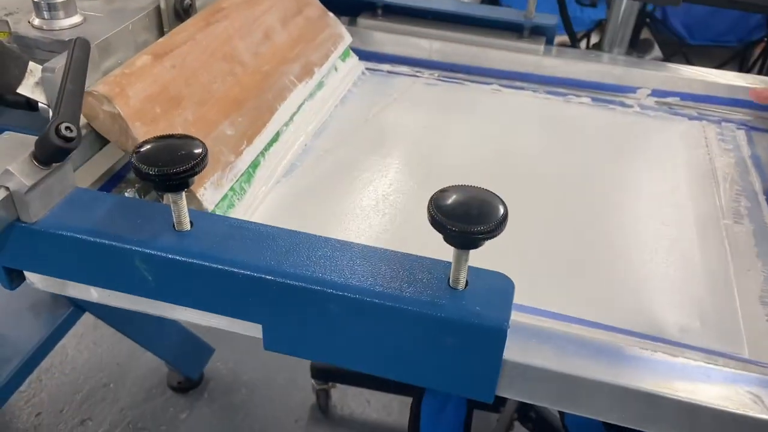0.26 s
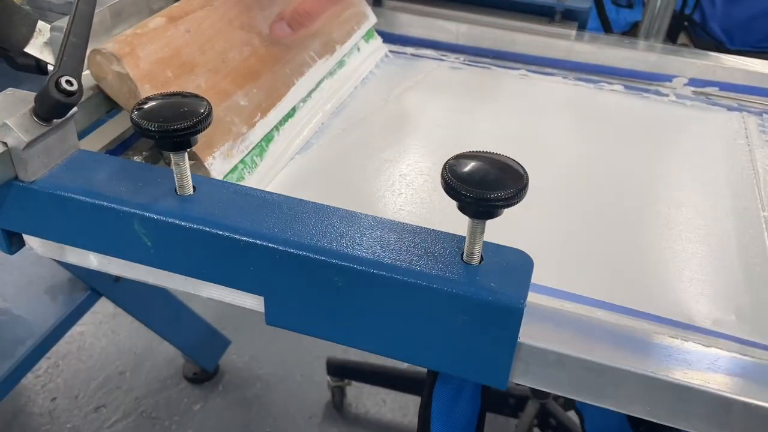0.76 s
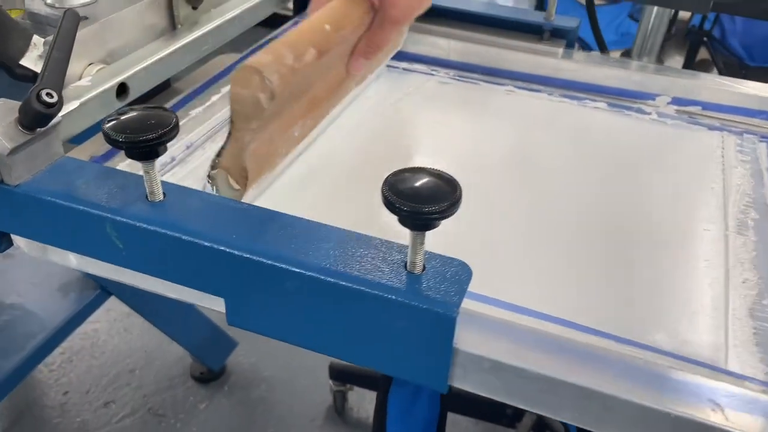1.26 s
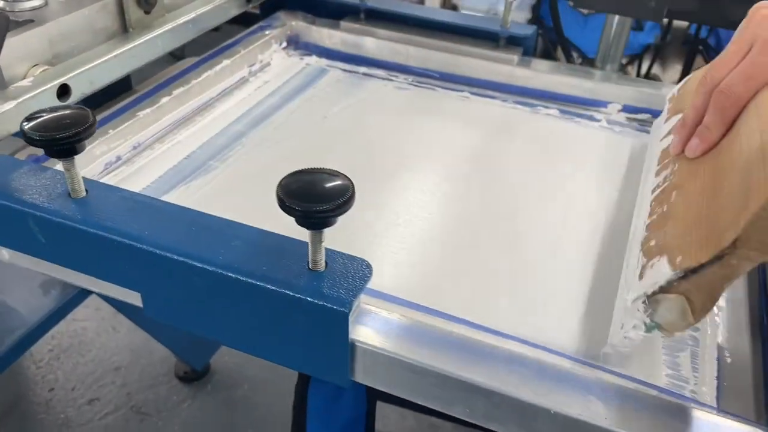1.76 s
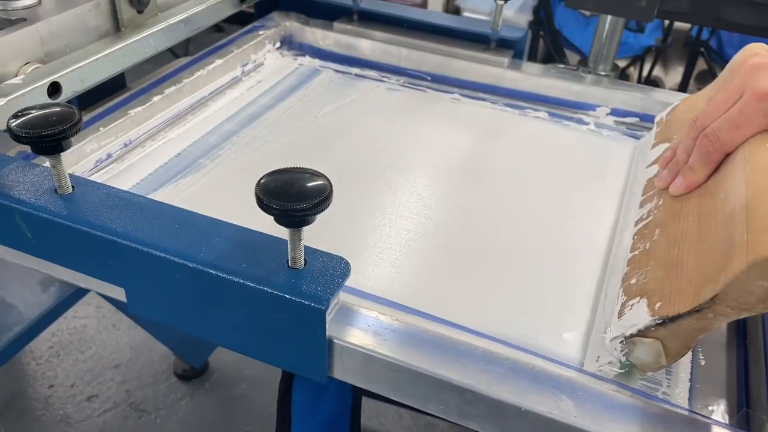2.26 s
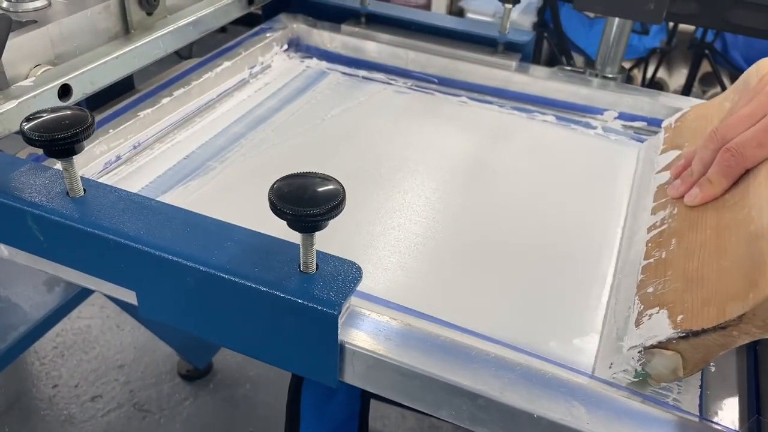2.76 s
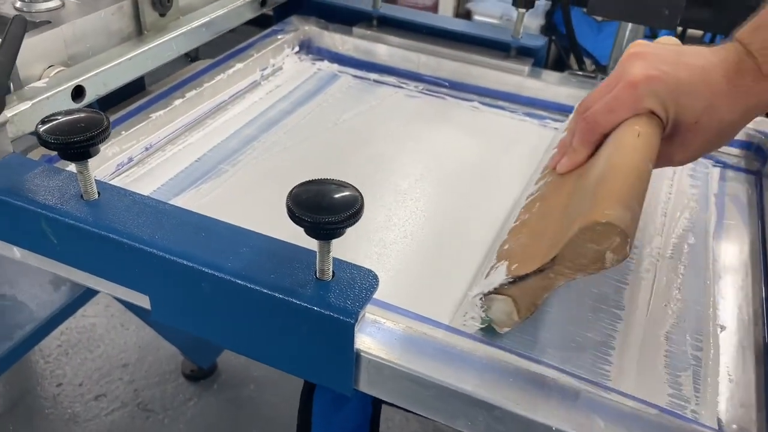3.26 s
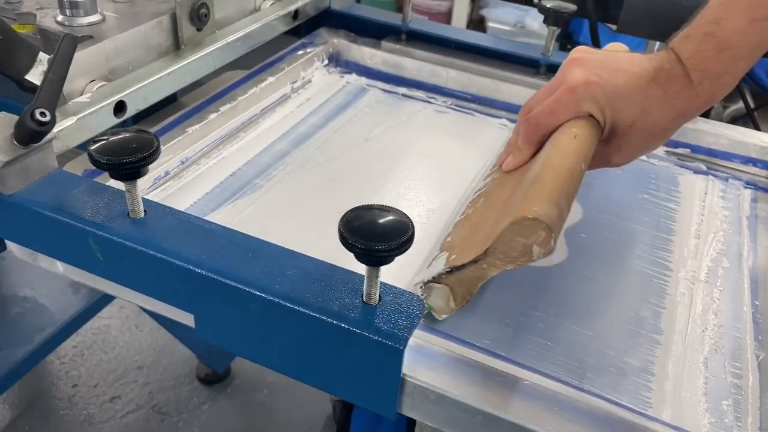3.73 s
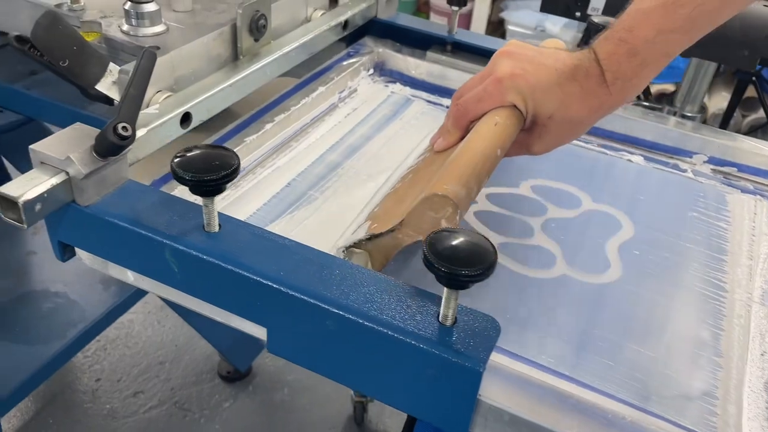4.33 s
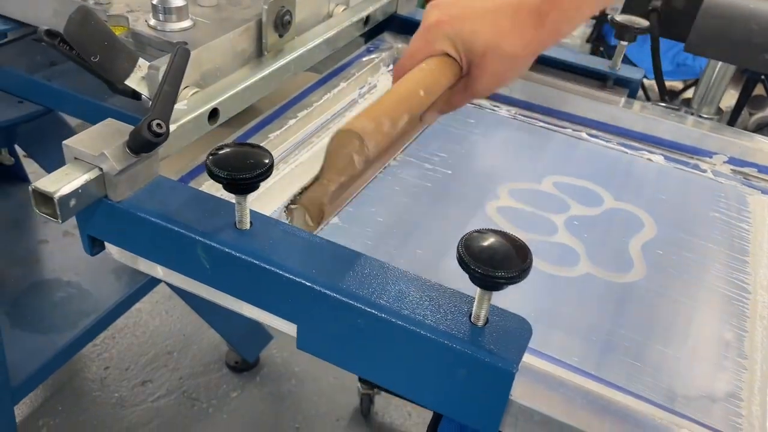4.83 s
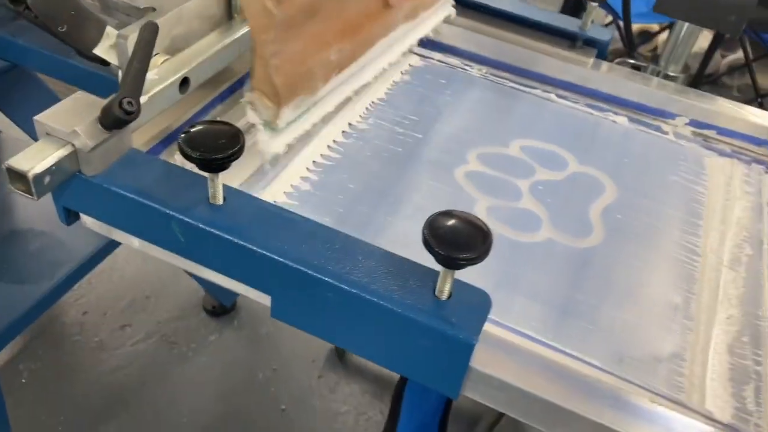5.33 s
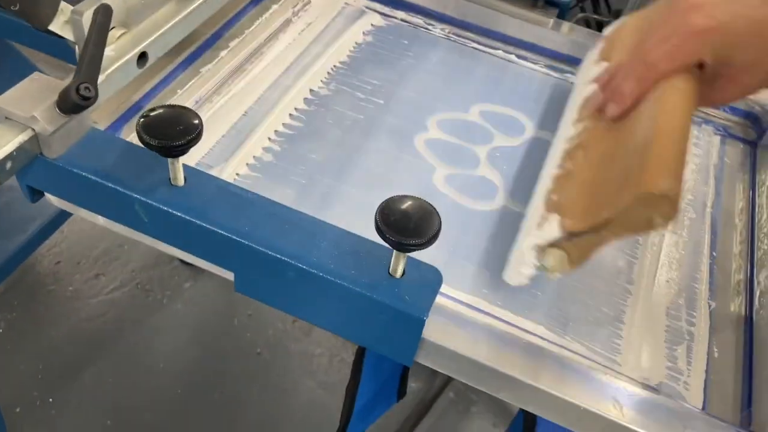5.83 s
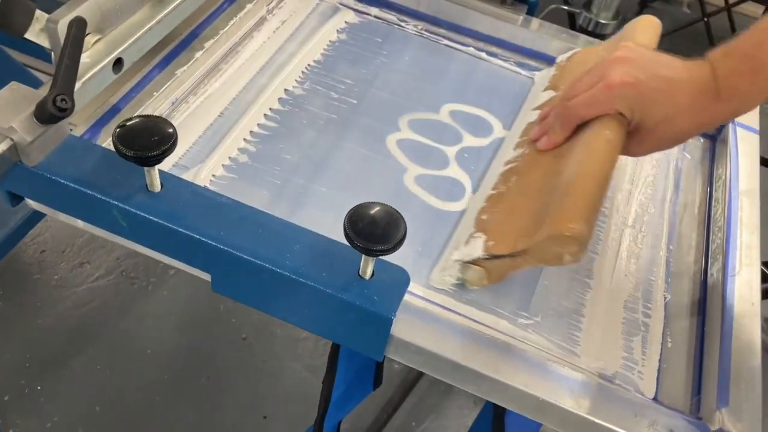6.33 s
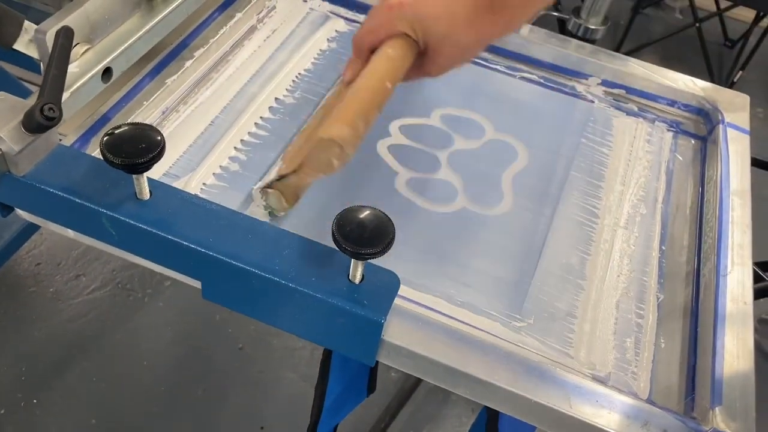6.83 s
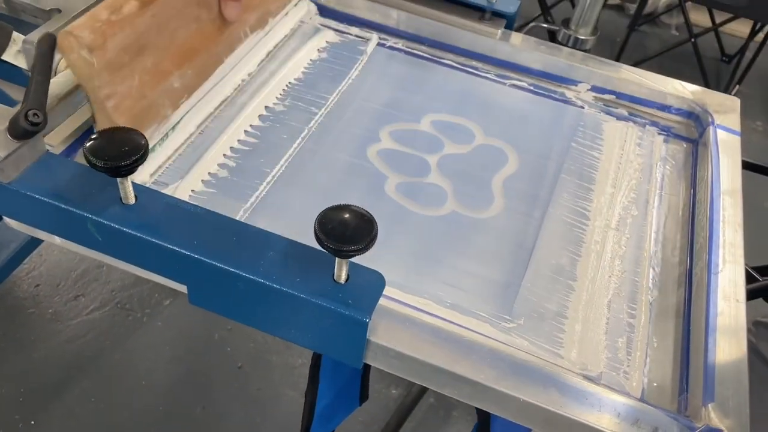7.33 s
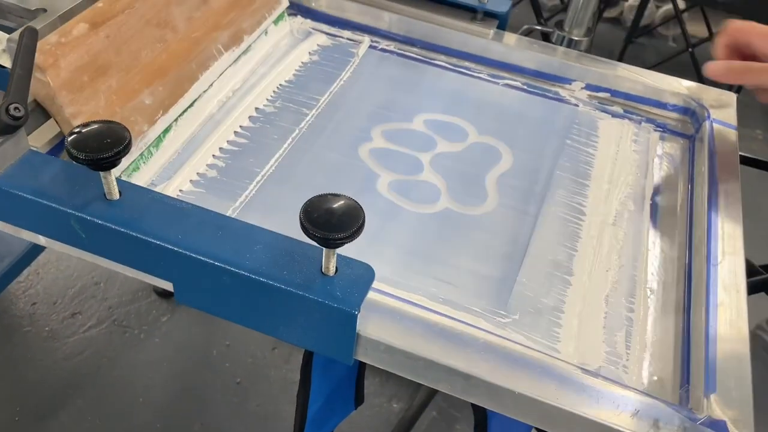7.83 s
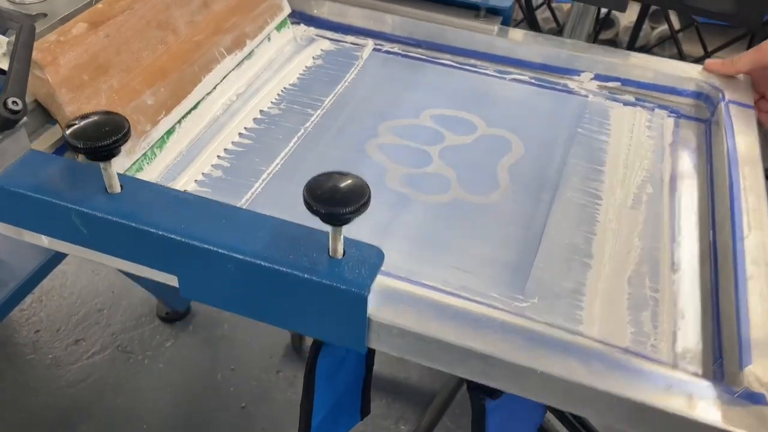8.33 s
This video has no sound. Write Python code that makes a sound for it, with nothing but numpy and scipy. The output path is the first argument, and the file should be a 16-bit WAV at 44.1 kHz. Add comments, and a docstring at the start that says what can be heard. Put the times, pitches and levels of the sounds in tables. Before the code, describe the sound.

Close hand-held stereo in a small, dull-sounding workshop with steady low fan hum. Light knocks and a sticky crack, a soft drum-like thump on a taut screen, then a long wavering, singing scrape of a squeegee over mesh. A crack and thump precede a faster, higher pull. Crunchy rubs follow, then a hard knock on the frame, and finally springs squeak.

```python
"""A humming workshop: a squeegee is pulled twice along a mesh screen, near a hand-held stereo microphone.
The blade crossing the threads sings at speed times thread count, over a hiss of ink and mesh.
It thumps the taut screen and knocks the platen and the frame (ringing modes), with cracks, scuffs, ticks,
rubs and peeling ink (noise bursts). The hinge springs squeal as the screen is lifted: thin lines with
overtones. A short dull room tail follows."""
import sys
import numpy as np
from scipy import signal
from scipy.fft import rfft, irfft
from scipy.io import wavfile
from scipy.ndimage import uniform_filter1d

SR = 44100
rng = np.random.default_rng(int(sys.argv[2]) if len(sys.argv) > 2 else 0)


def file_out(sig):
    """Save sig as 16-bit WAV at sys.argv[1]."""
    # one column per channel
    cols = np.atleast_2d(sig).T
    # limit, then scale
    lim = np.clip(cols, -1, 1)
    pcm = np.round(lim * 32767).astype(np.int16)
    wavfile.write(sys.argv[1], SR, pcm)


def to_linear_factor(level_db):
    """Convert decibel levels (scalar or array-like) to linear amplitude factors."""
    exponent = np.asarray(level_db, float) / 20
    return 10 ** exponent


N = 378364
T = np.arange(N) / SR
HZ = np.fft.rfftfreq(N, 1 / SR)


def unit(x):
    """Scale to rms 1."""
    return x / np.sqrt(np.mean(np.abs(x) ** 2))


def across(table, column=1):
    """Column of an (f/Hz, ..) table at every frequency bin, interpolated on log frequency."""
    table = np.transpose(table)
    return np.interp(np.log(HZ + 1), np.log(table[0]), table[column])


def walk(cutoff_hz):
    """Smooth chance below cutoff_hz, rms 1."""
    lowpass = signal.butter(2, cutoff_hz, fs=SR, output="sos")
    return unit(signal.sosfilt(lowpass, rng.standard_normal(N)))


def bandpass(x, low_hz, high_hz):
    """Second-order Butterworth band."""
    return signal.sosfilt(signal.butter(2, [low_hz, high_hz], "band", fs=SR, output="sos"), x)


def add(out, start_s, x):
    """Mix x into out from start_s."""
    i = int(start_s * SR)
    out[i:i + len(x)] += x[:N - i]


# workshop hum spectrum: (f/Hz, density/dB per Hz, left-right likeness/0-1)
HUM = [(22, -76, 0.94), (41.3, -66, 1), (62.6, -62, 0.98), (149, -65.5, 0.95), (250.3, -70, 0.79),
       (314, -77, 0.5), (554, -82, 0.17), (735, -80.5, 0), (1300, -85, 0), (1940, -88, 0),
       (2080, -88.5, 0.4), (2270, -86, 0.6), (2460, -89.5, 0.44), (2800, -90, 0.54), (4000, -93.5, 0.17),
       (5650, -101.5, 0.37), (5970, -104, 0.83), (10400, -110, 0.95), (13300, -114, 0.8),
       (15900, -130, 0.9)]


def hum():
    """Fans and distant machines: shaped noise, left-right likeness set by frequency."""
    like = np.clip(across(HUM, column=2), 0, 1)
    a, b = rfft(rng.standard_normal((2, N))) * to_linear_factor(across(HUM)) * np.sqrt(SR / 2)
    mid = a * np.sqrt((1 + like) / 2)
    side = b * np.sqrt((1 - like) / 2)
    level_drift = to_linear_factor(.6 * walk(2.5))
    return irfft(np.array([mid + side, mid - side]), N) * level_drift


# decay time and level of the room tail
ROOM_T60_S, ROOM_DB = .2, -11


def room(x):
    """Diffuse dull tail: decaying noise, different on each side."""
    t = T[:SR // 2]
    tail = rng.standard_normal((2, len(t))) * to_linear_factor(-60 * t / ROOM_T60_S) * (t > .004)
    tail = bandpass(tail, 250, 3500)
    tail = tail / np.sqrt(np.sum(tail ** 2) / 2)
    return to_linear_factor(ROOM_DB) * signal.fftconvolve(x[None], tail, axes=1)[:, :N]


# hinge springs slipping: (start/s, end/s, slip rate/Hz, mid-slip level before flutter/dB, loss per overtone/dB)
SQUEALS = [(.68, .735, 13500, -68, 30), (8.41, 8.525, 3413, -51, 30), (8.44, 8.52, 2977, -47, 9),
           (8.47, 8.65, 2519, -50, 14), (8.495, 8.6, 2040, -48, 9), (8.53, 8.62, 2336, -39.5, 30),
           (8.50, 8.6, 3165, -55, 20), (8.51, 8.6, 3321, -58, 20), (8.51, 8.61, 5437, -59, 9),
           (8.41, 8.455, 3750, -59, 20)]


def springs():
    """Stick-slip of steel coils: thin lines with overtones, a little unsteady, strongest envelope half way."""
    out = np.zeros(N)
    for start_s, end_s, hz, db, loss_db in SQUEALS:
        swell = np.interp(T, [start_s, (start_s + end_s) / 2, end_s], [0, 1, 0])
        swell = swell * to_linear_factor(4.4 * walk(51.0))
        phase = 2 * np.pi * np.cumsum(hz * (1 + 0.00148 * walk(25.))) / SR
        for k in range(1, int(15500 // hz) + 1):
            out += swell * to_linear_factor(db - loss_db * (k - 1)) * np.sqrt(2) * np.sin(k * phase)
    return out


CREST_S = .0053  # all modes of a blow crest together here


def blows(events, modes, lag_ms, ring_db):
    """Each blow: first wave of a few cycles plus a ring; bending waves bring the lows later."""
    out, t = np.zeros(N), T[:SR // 2]
    for start_s, db, contact_ms in events:
        for hz, mode_db, t60_s in modes:
            soft = 1 / (1 + (hz * contact_ms / 1000) ** 2)  # long contact dulls
            late_s = np.maximum(t - lag_ms / 1000 * np.sqrt(100 / hz), 0)
            swell = 1 - np.exp(-late_s * hz * 2)
            first_wave = np.exp(-late_s * hz / 1.2)
            ring = to_linear_factor(ring_db - 60 * late_s / t60_s)
            mode = np.cos(2 * np.pi * hz * (t - CREST_S))
            add(out, start_s, to_linear_factor(db + mode_db) * soft * swell * (first_wave + ring) * mode)
    return out


# wooden handle or hand on the frame: (t/s, blow/dB, contact/ms)
KNOCKS = [(.0623, -30, 0.21), (.172, -31.5, 0.41), (7.5125, -9.5, 0.75), (8.462, -29.5, .4)]
# frame modes: (f/Hz, level re blow/dB, t60/s)
FRAME = [(232.5, -5.5, 0.13), (308, -5.3, 0.11), (404, -6, 0.11), (487.5, -10, 0.12), (595, -3.5, 0.072),
         (717, -9.5, 0.059), (779, -9, 0.076), (864, -8, 0.09), (1105, -4.5, 0.028), (1470, -9, 0.025),
         (1800, -5.5, 0.039), (2420, -5, 0.018), (3060, -3, 0.016), (4500, -0.5, .025)]


def frame():
    """Knocks on the frame: modes whose ring is weaker than the first wave."""
    return blows(KNOCKS, FRAME, lag_ms=4., ring_db=-11.)


# blade on the platen under the mesh: (t/s, blow/dB, contact/ms)
LANDINGS = [(4.813, -32, 1.2), (5.9942, -18.5, 0.61), (6.094, -38, 0.89), (6.874, -30, 2),
            (6.8877, -22, 0.34)]
# platen modes: (f/Hz, level re blow/dB, t60/s)
PLATEN = [(250, 0.5, 0.026), (331, -1.5, 0.12), (453, -0.5, 0.039), (537, -15.5, 0.039), (691, 8, 0.014),
          (965, 4.5, 0.023), (1110, -6, 0.025), (1470, 1, 0.043), (1698, 7, 0.023), (2177, 2.5, 0.035),
          (2600, 5, 0.017), (3020, 2.5, 0.014), (4000, -24, .02), (5100, -1, 0.024)]


def platen():
    """Blade landing on the platen: modes whose ring is weaker than the first wave."""
    return blows(LANDINGS, PLATEN, lag_ms=5., ring_db=-7.)


# blade on the taut mesh: (t/s, blow/dB)
THUMPS = [(1.292, -22), (5.998, -23), (7.512, -36), (8.463, -43.5)]
# mesh modes: (f/Hz, level re blow/dB, t60/s)
MESH = [(133, 0.2, 0.23), (172, -8, 0.18), (196, -7, 0.097), (66.2, -11.5, 0.2)]


def mesh():
    """Thumps on the taut screen: low modes whose ring outweighs the first wave."""
    contact_ms = .1
    return blows([(s, db, contact_ms) for s, db in THUMPS], MESH, lag_ms=7.1, ring_db=7.5)


def burst(rise_ms, t60_ms, hz, db, treble_db):
    """Crackly noise round a centre plus a treble spray: linear rise, exponential decay."""
    ms = 1000 * T[:SR // 3]
    shape = np.where(ms < rise_ms, ms / rise_ms, to_linear_factor(-60 * (ms - rise_ms) / t60_ms))
    grain_gain = to_linear_factor(rng.standard_normal(len(ms) // 40 + 1)).repeat(40)[:len(ms)]  # new every 40 samples
    crackle = rng.standard_normal((2, len(ms))) * grain_gain
    body = unit(bandpass(crackle[0], hz / 1.42, hz * 1.42))
    spray = unit(bandpass(crackle[1], 6000, 12500))
    return shape * (to_linear_factor(db) * body + to_linear_factor(treble_db) * spray)


# short rubs that swell first: (t/s, t60/ms, centre f/Hz, centre level/dB, treble level/dB)
RUBS = [(.0623, 96, 860, -37.5, -50.5), (.07, 260, 1300, -41, -60), (.0625, 84, 3120, -43.5, -55),
        (.86, 190, 5000, -79, -64), (1.275, 105, 990, -39, -56.5), (4.82, 105, 563, -40, -63),
        (7.328, 75, 1350, -34, -43), (7.329, 57, 4000, -37, -57), (7.385, 330, 4500, -64, -63),
        (8.421, 330, 3080, -60, -58)]


def rubs():
    """Rubbing noise: swell time in proportion to decay time."""
    out = np.zeros(N)
    for start_s, t60_ms, *colour in RUBS:
        add(out, start_s, burst(0.13 * t60_ms, t60_ms, *colour))
    return out


# ink stretching off the blade: (t/s, swell/ms, centre f/Hz, centre level/dB, treble level/dB)
PEELS = [(.262, 17, 2900, -47, -40), (4.822, 36, 1530, -39.5, -47.5), (4.82, 37, 3400, -46.5, -60),
         (8.49, 87, 2600, -51, -51.5)]
PEEL_T60_MS = 42


def peels():
    """Ink stretches, the noise swells, then decays once the ink lets go."""
    out = np.zeros(N)
    for start_s, swell_ms, *colour in PEELS:
        add(out, start_s, burst(swell_ms, PEEL_T60_MS, *colour))
    return out


# cracks of the blows, scuffs and ticks: (t/s, t60/ms, centre f/Hz, centre level/dB, treble level/dB)
SUDDEN_BURSTS = [(.129, 18, 2880, -53, -53), (0.171, 104, 1300, -35.5, -59),
                 (0.2579, 7.4, 1230, -26.5, -27.5), (.26, 29, 2600, -30.5, -46),
                 (1.387, 40, 1480, -44.5, -74), (2.1637, 350, 2000, -45, -62), (2.168, 140, 724, -44, -70),
                 (2.2736, 28, 1780, -35, -75), (4.742, 26, 3060, -65, -54), (4.655, 18, 5000, -62, -56),
                 (4.766, 20, 4000, -62, -54), (4.776, 16, 4000, -62, -51), (4.784, 22, 3060, -50, -49),
                 (5.9745, 55, 870, -44, -61), (5.9948, 26, 2480, -28.5, -38.5), (5.998, 94, 690, -30, -70),
                 (6.055, 20, 5000, -65, -50), (6.8874, 27, 3230, -39, -71), (7.362, 55, 1900, -32, -41),
                 (7.3625, 40, 4300, -44, -57), (7.5118, 46, 2480, -40, -60), (8.199, 310, 1800, -45, -60)]
SUDDEN_RISE_MS = 1.6


def cracks_and_scuffs():
    """Sudden noise bursts: cracks of the blows, scuffs and ticks."""
    out = np.zeros(N)
    for start_s, t60_ms, *colour in SUDDEN_BURSTS:
        add(out, start_s, burst(SUDDEN_RISE_MS, t60_ms, *colour))
    return out


# arm trembles, blade surges: (start t/s, surges/count, speed gain/share)
JUDDERS = [(3.29, 4, .27), (6.468, 4, .19)]
JUDDER_HZ = 11.5


def judder():
    """Factor on the speed: each bout is a row of smooth surges."""
    out = np.ones(N)
    for start_s, surges, share in JUDDERS:
        turns = np.clip((T - start_s) * JUDDER_HZ, 0, surges)
        out += share * np.sin(np.pi * turns) ** 2
    return out


def threads(hz, tone_db, octave_db, drift_hz):
    """Tone and overtones of one stretch of blade; its points drift out of step, so it beats, overtones most."""
    out, phase = 0, 2 * np.pi * np.cumsum(hz) / SR
    for k in range(1, 6):
        db = tone_db if k == 1 else octave_db - 12 * (k - 2) ** .7
        steady = 1.3 / k ** .5
        drift = unit(steady + walk(drift_hz * k) + 1j * walk(drift_hz * k))
        out = out + to_linear_factor(db) * np.sqrt(2) * np.real(drift * np.exp(1j * k * phase))
    return out


# colour of the blade's hiss over the threads: (f/Hz, gain/dB)
HISS = [(150, 19), (500, 10), (1500, 10.5), (3000, 7.5), (5300, -0.5), (6200, -1.5), (8000, 1), (12000, 1),
        (15500, -8.5)]
# speed, one list per pull, before smoothing and judder: (t/s, thread crossing rate/Hz)
SPEEDS = [
    [(2.741, 403.7), (2.816, 350), (2.859, 475.5), (2.941, 1265), (2.993, 1519), (3.051, 1088),
     (3.095, 1115), (3.145, 860), (3.188, 977), (3.22, 710.4), (3.255, 672), (3.285, 517), (3.32, 630),
     (3.38, 685), (3.47, 590), (3.64, 660), (3.72, 796), (3.761, 947), (3.824, 846), (3.926, 997),
     (3.976, 927), (4.02, 981), (4.161, 926), (4.21, 592), (4.288, 807), (4.36, 594), (4.457, 915),
     (4.664, 612.3), (4.69, 365.5), (4.712, 366)],
    [(6.081, 679.6), (6.165, 722), (6.223, 1469), (6.291, 1202), (6.366, 2080), (6.425, 2034),
     (6.475, 1613), (6.647, 1500), (6.735, 1246), (6.777, 1098), (6.824, 373), (6.849, 306.4)],
]
# levels before wander, one list per pull: (t/s, song/dB, its octave/dB, far end of blade/dB, hiss/dB)
PULL_LEVELS = [
    [(2.741, -47, -67, -50, -82), (2.83, -42.5, -50.5, -50, -76), (2.9, -55, -51, -49, -63),
     (2.95, -37, -58, -37, -52.5), (2.993, -27, -46.5, -37, -51.5), (3.045, -39.5, -43, -51, -56),
     (3.1, -31.5, -47.5, -50, -54.5), (3.2, -41, -56, -51, -59), (3.285, -47.5, -46.5, -44.5, -60),
     (3.36, -37.5, -52, -47, -57.5), (3.42, -38.5, -50, -49, -58), (3.47, -47, -53, -47, -62),
     (3.53, -39, -47.5, -50, -63), (3.62, -43, -50.5, -51, -62), (3.8, -44, -49.5, -58, -60),
     (3.99, -40, -46, -47, -61.5), (4.08, -42.5, -65, -73, -63), (4.21, -50, -55.5, -58, -65),
     (4.5, -42, -55.5, -58, -63.5), (4.64, -42, -46, -61, -62), (4.69, -47, -75, -55, -69),
     (4.712, -57, -63, -64, -60)],
    [(6.081, -52, -51, -56, -56), (6.13, -36.5, -59, -44, -55.5), (6.18, -54, -54, -59, -57.5),
     (6.215, -36.5, -64, -69, -50.5), (6.25, -47, -69, -34.5, -50), (6.29, -34.5, -68, -55, -49),
     (6.36, -46, -52, -63, -53), (6.43, -37, -48, -55, -50.5), (6.5, -32.5, -57, -46, -53.5),
     (6.6, -35.5, -50, -48, -52), (6.64, -45, -58, -65, -54.5), (6.68, -35.5, -55, -58, -52),
     (6.79, -47.5, -52.5, -46, -55.5), (6.826, -39, -62, -49, -62), (6.849, -47.5, -70, -64, -54)],
]
WANDER_DB, WANDER_HZ = 2, 20  # octave and far end come and go


def strokes():
    """The blade sings over the threads; its far end trails and wanders, and ink and mesh hiss."""
    out = np.zeros(N)
    hiss = irfft(rfft(rng.standard_normal(N)) * to_linear_factor(across(HISS)), N)
    for speed, levels in zip(SPEEDS, PULL_LEVELS):
        s, hz = np.transpose(speed)
        hz = uniform_filter1d(np.interp(T, s, hz), SR // 120) * judder()
        when_s, *columns = np.transpose(levels)
        tone_db, octave_db, far_db, hiss_db = (np.interp(T, when_s, c) for c in columns)
        octave_db = octave_db + WANDER_DB * walk(WANDER_HZ)
        far_db = far_db + WANDER_DB * walk(WANDER_HZ)
        touch = np.interp(T, [s[0] - .02, s[0], s[-1], s[-1] + 0.084], [0, 1, 1, 0])
        near = threads(hz * (1 + .008 * walk(40.)), tone_db, octave_db, drift_hz=20.)
        trail_hz = np.interp(T - .025, T, hz) * (1 + .08 * walk(12.))  # 25 ms behind
        far = threads(trail_hz, far_db, far_db - 11, drift_hz=121.0)
        rasp = to_linear_factor(hiss_db + 0.99 * walk(28.0)) * hiss
        out += touch * (near + far + rasp)
    return out


def scene():
    """All that happens on the press, its room, and the hum."""
    hits = frame() + platen() + mesh() + rubs() + peels() + cracks_and_scuffs() + springs()
    pulls = strokes()
    # the pulls are close to the microphone, so they carry less room
    return hits + pulls + room(hits + to_linear_factor(-6) * pulls) + hum()


def top_cut(x):
    """Nothing passes above the cut-off."""
    return signal.sosfilt(signal.butter(12, 16450, fs=SR, output="sos"), x)


# microphone pair phase: (f/Hz, left lead/rad)
PORTS = [(0, 0), (860, .5), (1810, -.8), (2330, .5), (3100, 1.4), (4310, .5), (5340, .5), (5800, -1.7),
         (6550, -.8), (7580, -3.1), (9560, -3.2), (12500, -6.2), (16000, -6.3)]
# microphone pair response: (f/Hz, gain/dB, left minus right/dB)
PAIR = [(25, -13, -1), (40, -0.2, 1), (252, -0.48, -1), (700, -0.92, 2), (2530, -2.5, 0.9),
        (4200, -2.5, 5.5), (7350, 0.8, 3.5), (10250, 3, 4.5), (11500, -1, -5), (14700, 2.5, 7.5),
        (15700, -19, 2), (16400, -50, -10)]


def record(dry):
    """The two microphone ports differ in phase and level; the top is cut."""
    half_phase = np.exp(.5j * np.interp(HZ, *np.transpose(PORTS)))
    left = half_phase * to_linear_factor(across(PAIR, column=2) / 2)
    ports = np.array([left, 1 / left])
    mix = irfft(rfft(dry) * to_linear_factor(across(PAIR)) * ports, N)
    return top_cut(mix)


dry = scene()
out = record(dry)
file_out(out)
```